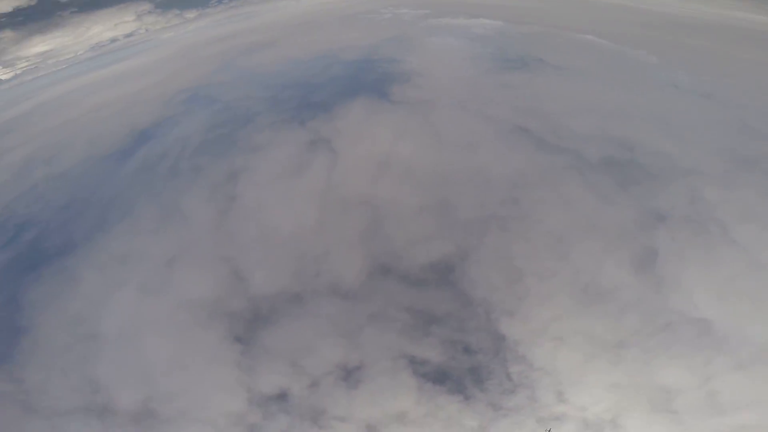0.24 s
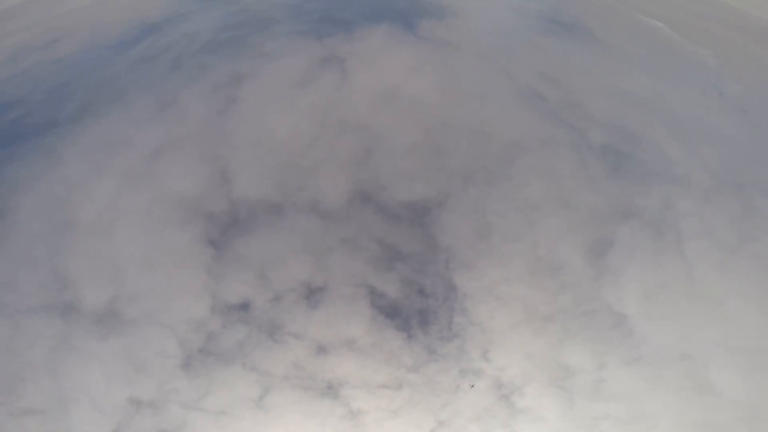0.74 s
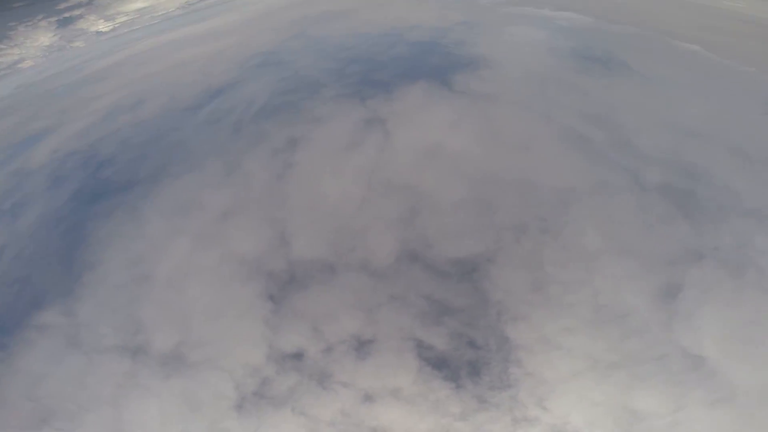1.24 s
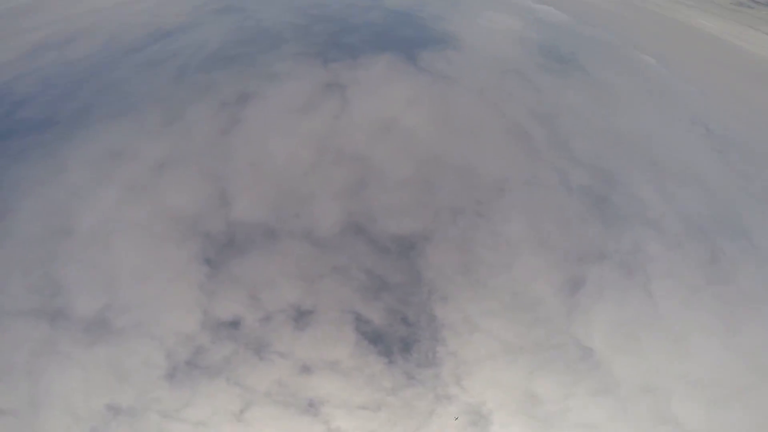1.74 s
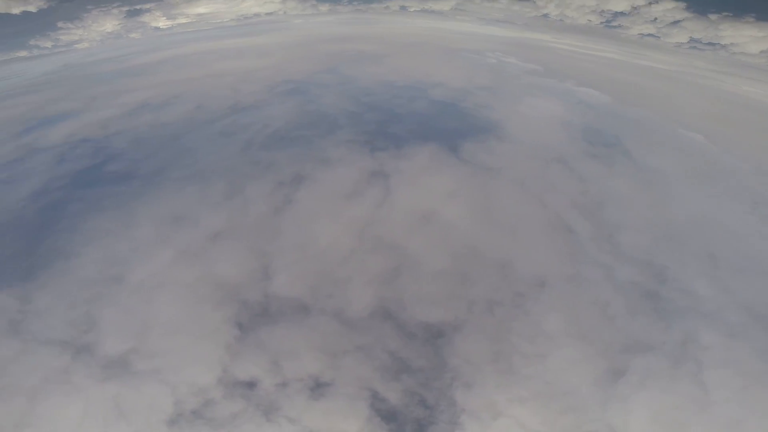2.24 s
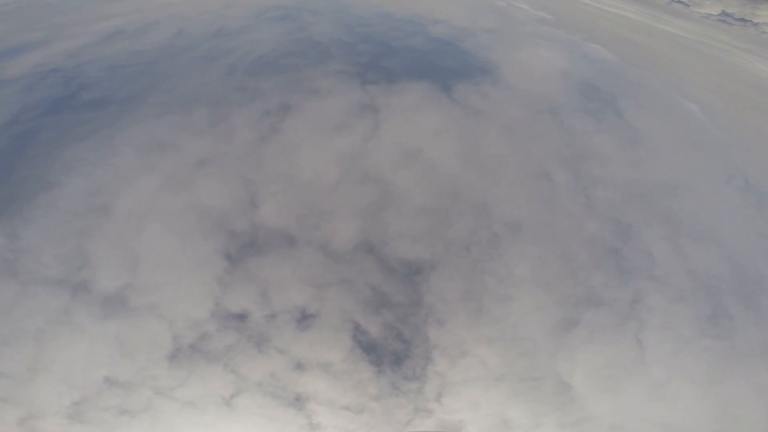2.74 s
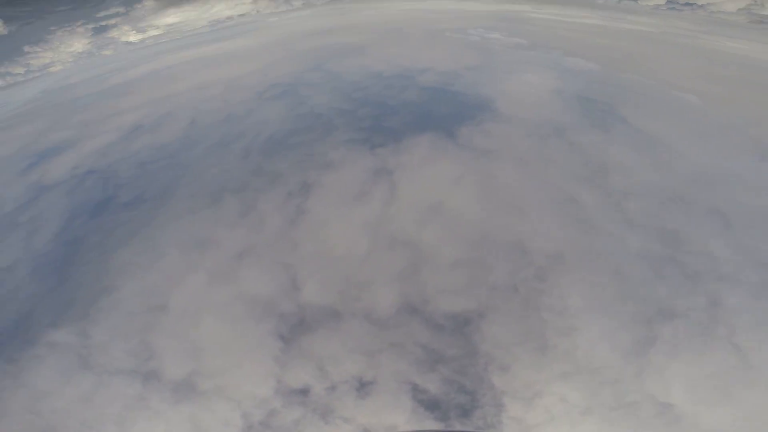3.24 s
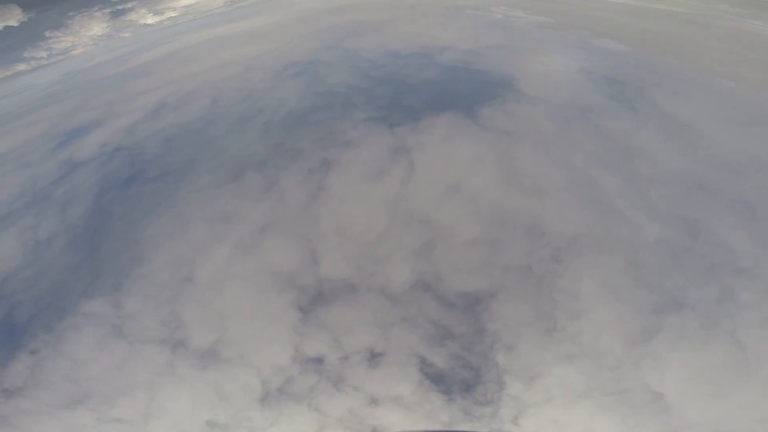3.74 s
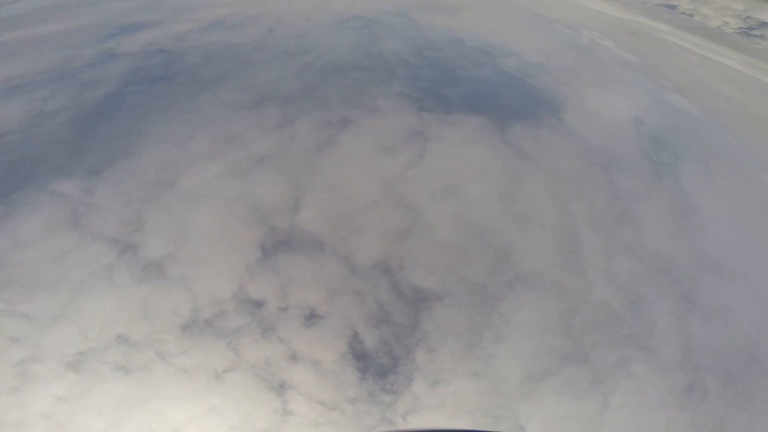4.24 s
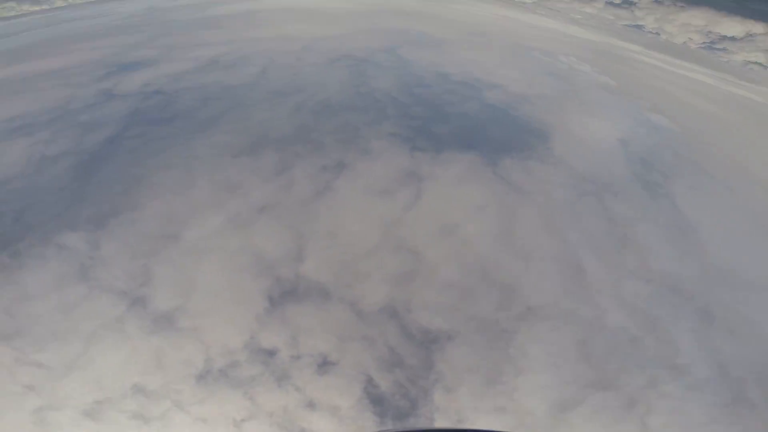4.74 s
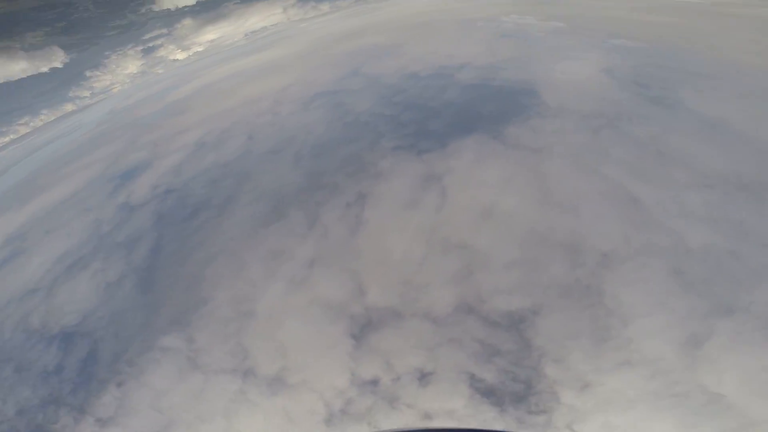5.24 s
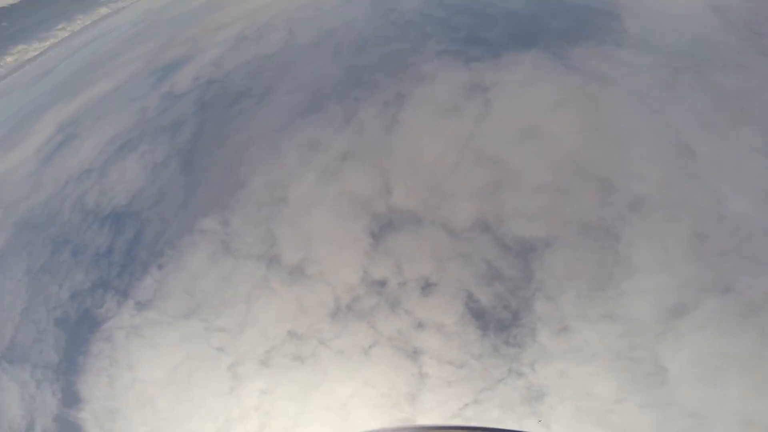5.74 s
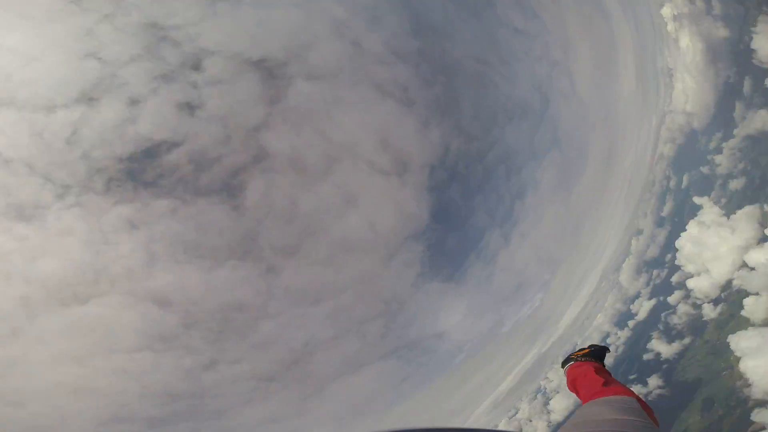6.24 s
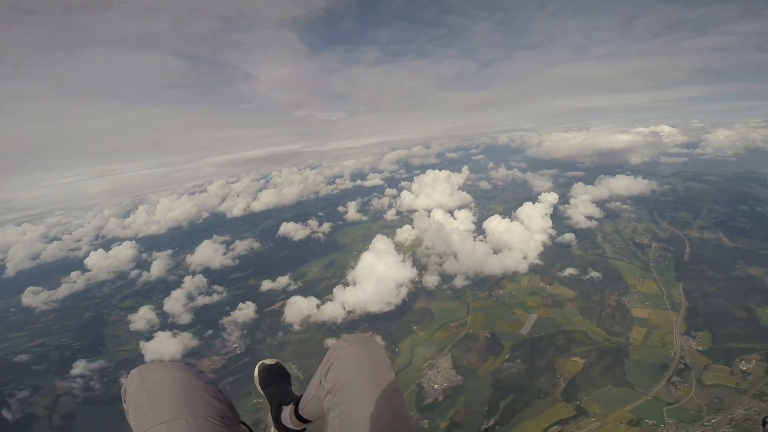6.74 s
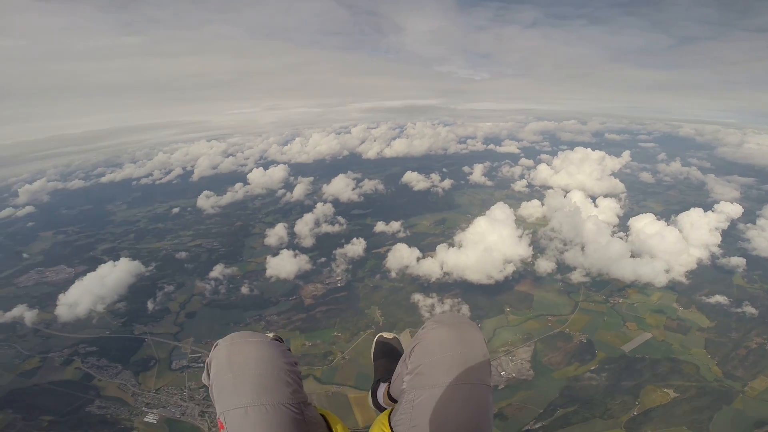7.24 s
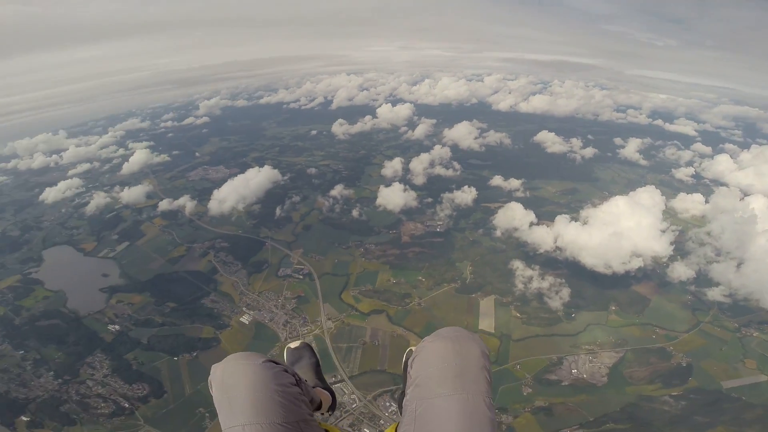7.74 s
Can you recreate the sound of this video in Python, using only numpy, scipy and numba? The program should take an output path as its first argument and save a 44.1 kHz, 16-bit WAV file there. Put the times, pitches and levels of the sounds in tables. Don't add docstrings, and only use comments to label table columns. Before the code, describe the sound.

Close, overloaded wind noise in free fall high among clouds. Air skims the camera housing with a rough hiss, a rumbling drone underneath and hollow noisy howls near the start, around one and a half seconds and just before six. Then the camera rolls upright into its own wake: the sound turns darker and broken, full of low thumps, gaps and bursting puffs.

```python
import sys
import numpy as np
from scipy import signal
from scipy.fft import rfft, irfft, next_fast_len
from scipy.io import wavfile
from scipy.ndimage import uniform_filter1d
from numba import njit

SR = 44100
rng = np.random.default_rng(int(sys.argv[2]) if len(sys.argv) > 2 else 0)


def convert_level_to_amplitude(level_db):
    exponent = np.asarray(level_db, float) / 20
    return 10 ** exponent


def waveform_to_disk(signal):
    frames = np.transpose(np.atleast_2d(signal))
    scaled = np.clip(frames, -1, 1) * 32767
    samples = np.round(scaled).astype(np.int16)
    wavfile.write(sys.argv[1], SR, samples)


N = 352359

# start_s, peak_db, treble_share_db
PUFFS = [(6.409, -2.5, -23), (6.4885, -1, -29), (6.5957, -14.5, -21), (6.6343, -9, -28), (6.665, -17, -21),
         (6.7776, -8, -28), (6.8321, -20, -29), (6.884, -13, -24), (6.964, -4, -24), (6.991, -13, -25),
         (7.0367, -11, -23), (7.0558, -9.5, -24), (7.121, -10, -30), (7.175, -7, -25), (7.2125, -5.5, -29),
         (7.285, -10, -25), (7.375, 1.5, -23.5), (7.4218, -7, -22), (7.5203, -9, -21), (7.553, 1, -24),
         (7.5716, -4, -27), (7.6995, -3, -24), (7.727, -6, -18.5), (7.771, -6, -24), (7.7978, -2, -24),
         (7.8174, 0.5, -24), (7.8436, -6, -26), (7.8658, -5, -23), (7.933, 0, -26), (7.9516, -2, -22)]
# start_s, peak_db, treble_share_db
SNAPS = [
    (1.0203, 4, -35),
    (1.816, -5.3, -30),
]
# start_s, depth_db, recovery_s
GAIN_DROPS = [
    (.686, -4, 0.22),
    (1.025, -9.5, 0.084),
    (1.826, -6.5, 0.11),
    (5.91, -4, 0.065),
    (4.6, -1.5, 0.042),
]
# pitch_hz, level_db (per Hz)
HISS_SPECTRUM = [(900, -16.5), (1200, -7), (1450, -4.5), (2000, -1.5), (2450, -2), (3100, -2.5), (3500, -6),
                 (6200, -11.5), (6600, -13.5), (7400, -18.5), (8900, -18.5), (11700, -24.5), (12400, -29),
                 (13900, -29.5), (15200, -37.5)]
# pitch_hz, level_db (per Hz)
RUSH_SPECTRUM = [(420, -11.5), (560, -8.5), (780, -1), (1000, -1.5), (1250, -2.5), (1500, -19)]
# pitch_hz, level_db (per Hz)
GROWL_SPECTRUM = [(120, -5), (150, -8.5), (220, -3), (330, -4.5), (460, -8), (560, -15)]
# pitch_hz, width_hz, lift_db
HOUSING_RINGS = [(1475, 210, 4.5), (2010, 200, 2.5), (2730, 190, 6), (4860, 420, 2), (5930, 380, 2.5),
                 (8150, 370, 1), (12060, 200, 3)]
# pitch_hz, width_hz, level_db
PUFF_RINGS = [(1600, 380, 0), (1900, 380, 0), (3000, 700, -7)]
# start_s (centre), length_s, pitch_hz, width_hz, lift_db
WHISTLES = [(0.592, .06, 8500, 1200, 4), (0.624, 0.036, 5000, 1200, 3), (1.3, .15, 2800, 250, 3.5),
            (1.62, .05, 2800, 400, 5), (2.8, .15, 7800, 900, 5), (3.55, .15, 10700, 900, 6.5),
            (3.6, .16, 5000, 500, 4), (4.35, .3, 2720, 120, 2), (4.45, .2, 8000, 900, 4.5),
            (5.65, .3, 2750, 120, 0), (5.73, .14, 5000, 1400, 5), (6.15, .12, 8650, 900, 5.5)]
# start_s (centre), low_hz, high_hz, level_db
SIDE_NOISE = [(.375, 6200, 8350, -36), (3.0, 8200, 9800, -40), (3.0, 12400, 15200, -48),
              (4.95, 4240, 7450, -29), (4.95, 12400, 13900, -53), (5.0, 4600, 5750, -32),
              (5.0, 10300, 11900, -44), (5.72, 8900, 10500, -38), (5.72, 13100, 14600, -52),
              (5.95, 4600, 5750, -35), (6.11, 4200, 5160, -28)]
# start_s, peak_db
KNOCKS = [
    (6.489, -0.5),
    (6.521, -6),
    (6.541, -5),
    (6.993, -8),
    (7.214, -1.5),
    (7.441, -9),
    (7.70, -4.5),
]
# start_s (centre), length_s, level_db
LULLS = [(7.024, 0.011, -8), (7.25, 0.016, -9), (7.277, .007, -5), (6.93, .012, -3), (7.135, .006, -3),
         (7.458, 0.02, -6.5), (7.691, 0.01, -11), (7.946, 0.0054, -8), (7.968, 0.0044, -5),
         (1.85, 0.018, -2), (1.045, .015, -1), (7.76, 0.0087, -9), (7.1, 0.023, -4), (7.715, .005, -6),
         (9, .005, -7), (6.53, .005, -4), (5, .006, -3), (6.655, .006, -4), (9.9, 0.0087, -5),
         (7.785, 0.0054, -13)]
# start_s (centre), length_s, level_db
SURGES = [(6.75, .03, 2.9), (6.985, 0.052, 5), (7.13, .008, 4), (7.293, .008, 5), (7.315, 0.032, 7),
          (7.405, 0.027, 5.5), (7.54, 0.034, 3), (7.64, 0.015, 1), (7.735, .012, 2), (7.87, 0.065, 2),
          (6.5, .02, 2)]
# start_s, flow_db, exposure_db, fineness_db (of the eddies)
FLOW = [(0, -21, 2, 3), (.4, -19.5, 0, 0.5), (1.2, -19, 0, 0.5), (1.55, -20.5, 0.5, 0),
        (1.98, -20.5, -0.5, 0.5), (2.25, -20.5, 1.5, 3), (2.7, -19.5, -0.5, 0), (3.1, -19.5, 0, 0),
        (3.55, -20.5, 1, 3), (4.5, -18.5, 0, -1.5), (5.0, -21, 1, 3), (5.4, -18.5, -1, 1),
        (6.33, -19.5, 1.5, -1), (6.37, -24.5, -3.5, 5), (6.515, -21.5, -6, -1), (6.535, -35.5, -5.5, 1),
        (7.2, -31, -5, -1), (7.99, -25, -3.5, -4)]
# start_s, cavity_drive_db (over the flow), cavity_hz
PORT_ANGLE = [(0, 2.5, 1420), (.55, 0.5, 1480), (.9, 2.5, 1540), (1.45, 0, 1480), (2.0, -1.5, 1590),
              (2.45, 1.5, 1430), (2.6, -.5, 1600), (3.25, -2.5, 1700), (3.6, -1, 1670), (4.3, -1.5, 1650),
              (4.9, -2, 1640), (5.3, -1, 1700), (5.6, -2.5, 1650), (6.3, -0.5, 1650), (6.5, 1.5, 1500),
              (6.6, 1.5, 1690), (7.99, 3, 1750)]
# start_s, shedding_db, churning_db
EDDIES = [(0, -25, 2.5), (.55, -21, 0.5), (.95, -19, 0.5), (1.1, -20, 4.5), (1.55, -23.5, -0.5),
          (2.1, -21.5, 0), (2.35, -25, -2.5), (2.5, -21.5, 1.5), (2.9, -19, 0), (3.6, -24.5, 1.5),
          (4.25, -19.5, 2.5), (4.6, -19.5, -1.5), (5.05, -31, -4.5), (5.4, -27, 3), (5.75, -21, -0.5),
          (6.4, -21, -0.5), (7.15, -17.5, -2), (7.99, -19.5, 6)]
# start_s (centre), length_s, shedding_db, churning_db
EDDY_BREAKS = [(0.057, 0.046, 3, 0.5), (0.21, .05, -8, 0.5), (0.71, 0.11, -4, -1), (0.935, 0.048, 4, 4),
               (2.47, .04, 3, -1), (4.38, 0.055, -5.5, 0), (4.66, .04, -5, 1), (5.3, .05, 4.5, 2),
               (5.55, .1, 0, -2), (5.5, 0.088, 1, 3.5), (6.34, .03, -7, -4), (6.44, 0.037, 4, 5),
               (6.62, 0.059, -1, -2), (6.505, .03, 3, 4), (5.08, .07, -0.5, -3), (2.58, .08, -0.5, 2),
               (3.7, .2, -0.5, 1), (7.5, 0.055, 1.5, -2), (7.32, .04, -2, 4), (7.88, 0.036, -6, 1)]
# start_s, length_s, lift_db, pitch_hz
HOWLS = [
    (.635, 0.119, 4.5, 1840),
    (0.969, .05, 6, 1780),
    (1.602, .224, 7, 1760),
    (5.798, 0.076, 3.5, 1820),
    (6.2, .06, 2, 2050),
    (6.26, .105, 3, 1780),
]
# start_s, length_s, flow_db, exposure_db
TURNS = [
    (.757, 0.219, -5.5, -4),
    (.79, 0.083, -1, -1.5),
    (.59, 0.063, 0, 1),
    (1.565, .04, 3.5, 0.5),
    (6.26, 0.072, -2, 3.5),
    (0.78, .055, -0.5, 2),
]

HOWL_DUCKS = dict(flow=0.33, fine=0.3, rush=1.14, growl=0.68, shedding=0.56, buffeting=1.2)
EDGE_S = 0.015
ROLL_S, ROLL_TAKES_S = 6.4, 0.12
THUMP_S, THUMP_LASTS_S, THUMP_DB = 6.475, .08, 9
SHED_HZ, WAKE_SHED_HZ = 97.1, 78.4
FLUTTER_DB, WAKE_FLUTTER_DB = 1, 4
BUFFET_DB, WAKE_BUFFET_DB, BUFFET_FOLLOWS_CHURN = -37.5, -21, .8
GROWL_DB, WAKE_GROWL_DB = -24, -24
RUSH_DB, WAKE_RUSH_DB, RUSH_FOLLOWS_FLOW, RUSH_FOLLOWS_CHURN = -26, -28, 0.54, 0.48
DULL_DB, DULL_PER_FINE = 2.5, .3
TEAR_DB, TEARS_PER_S, SHRED_DB, SHREDS_PER_S = 1, 37, 2, 75


def rms_one(x):
    return x / np.sqrt(np.mean(x ** 2) + 1e-20)


def in_time(rows):
    s, *columns = np.transpose(rows)
    return [np.interp(np.arange(N) / SR, s, column) for column in columns]


def held(start_s, length_s, edge_s):
    t = np.arange(N) / SR
    inside_s = np.minimum(t - start_s, start_s + length_s - t)
    return np.clip(inside_s / edge_s + .5, 0, 1)


def swing(rows, column):
    t = np.arange(0, N + 16, 16) / SR
    total_db = sum(row[column] * np.exp(-((t - row[0]) / row[1]) ** 2) for row in rows)
    return np.interp(np.arange(N) / SR, t, total_db)


def bumps(times_s, peak_db, rise_s):
    marks, t = np.zeros(N), np.arange(SR // 20) / SR
    marks[np.round(times_s * SR).astype(int)] = convert_level_to_amplitude(peak_db)
    shape = (t / rise_s * np.exp(1 - t / rise_s)) ** 2
    return signal.oaconvolve(marks, shape)[:N]


def drift(rate):
    r = np.exp(-16 * np.pi * rate / SR)
    noise = rng.standard_normal(N // 8 + 4002)
    slow = signal.lfilter([1], [1, -2 * r, r * r], noise)[4000:]
    slow -= uniform_filter1d(slow, size=SR // 40)
    return np.interp(np.arange(N) / 8, np.arange(len(slow)), rms_one(slow))


def band(x, low_hz, high_hz):
    edges_hz = [low_hz, min(high_hz, .45 * SR)]
    return signal.sosfilt(signal.butter(2, edges_hz, "band", fs=SR, output="sos"), x)


@njit
def sweep(x, hz, r, sr):
    y = np.zeros(len(x))
    for i in range(2, len(x)):
        push = (1 - r * r) / 2 * (x[i] - x[i - 2])
        y[i] = push + 2 * r * np.cos(2 * np.pi * hz[i] / sr) * y[i - 1] - r * r * y[i - 2]
    return y


def resonance(x, hz, width_hz):
    return sweep(x, hz * np.ones(N), np.exp(-np.pi * width_hz / SR), SR)


def coloured(x, hz_points, db_points):
    size = next_fast_len(N + 8192)
    hz = np.maximum(np.arange(size // 2 + 1) * SR / size, 1)
    gain = convert_level_to_amplitude(np.interp(np.log(hz), np.log(hz_points), db_points))
    wide = np.pad(x, (4096, size - N - 4096), "reflect")
    return irfft(rfft(wide) * gain, size)[4096:4096 + N]


def evened(x, over_s, share):
    power = uniform_filter1d(x ** 2, size=int(over_s * SR))
    return rms_one(x / (np.abs(power) + 1e-12) ** (share / 2))


def banded_noise(spectrum, gust_db, patchy_db, colour_db=lambda hz: 0):
    hz_points, db_points = np.transpose(spectrum)
    octaves = np.log2(hz_points[-1] / hz_points[0])
    edges = hz_points[0] * 2 ** np.arange(0, octaves + .4, 1 / 3)
    noise = [coloured(white, hz_points, db_points) for white in rng.standard_normal((2, N))]
    patch, out = drift(2.5), 0
    for k, (low, high) in enumerate(zip(edges, edges[1:])):
        patch = 0.48 * patch + 0.33 * drift(6.6)
        gain = convert_level_to_amplitude(colour_db(np.sqrt(low * high)) + gust_db + patchy_db * patch)
        out = out + gain * band(noise[k % 2], low, high)
    return out / np.std(noise)


def side_noise():
    t, noise, out = np.arange(N) / SR, rng.standard_normal(N), 0
    for s, low_hz, high_hz, db in SIDE_NOISE:
        moment = np.clip(2 - np.abs(t - s) / .009, 0, 1)
        edges_hz = [low_hz * .99, low_hz, high_hz, high_hz * 1.01]
        out = out + convert_level_to_amplitude(db) * moment * rms_one(coloured(noise, edges_hz, [-120, 0, 0, -120]))
    return out * [[1], [-1]]


def buffeting(level_db):
    lumps = band(rng.standard_normal(N), low_hz=27, high_hz=63.3)
    return convert_level_to_amplitude(level_db) * evened(lumps, over_s=.06, share=0.63)


def shedding(level_db, hz):
    noise = rng.standard_normal(N)
    drone = resonance(resonance(noise, hz, width_hz=23.0), hz, width_hz=119)
    return convert_level_to_amplitude(level_db) * evened(drone, over_s=0.043, share=0.38)


def housing_pressure(flow_db, lock_db, wake, gust_db):
    shed_db, churn_db = in_time(EDDIES)
    shed_db = shed_db + swing(EDDY_BREAKS, column=2)
    churn_db = churn_db + swing(EDDY_BREAKS, column=3)
    churn_db = churn_db + THUMP_DB * held(THUMP_S, THUMP_LASTS_S, edge_s=.03)

    shed_db = shed_db - HOWL_DUCKS["shedding"] * lock_db
    drone = shedding(shed_db, SHED_HZ + wake * (WAKE_SHED_HZ - SHED_HZ))

    buffet_db = BUFFET_DB + wake * (WAKE_BUFFET_DB - BUFFET_DB)
    buffet_db = buffet_db + (1 - wake) * BUFFET_FOLLOWS_CHURN * churn_db - HOWL_DUCKS["buffeting"] * lock_db

    growl_db = GROWL_DB + wake * (WAKE_GROWL_DB - GROWL_DB) + churn_db - HOWL_DUCKS["growl"] * lock_db
    growl = convert_level_to_amplitude(growl_db) * banded_noise(GROWL_SPECTRUM, 1.3 * gust_db, patchy_db=2.0)

    rush_db = RUSH_DB + wake * (WAKE_RUSH_DB - RUSH_DB) - HOWL_DUCKS["rush"] * lock_db
    rush_db = rush_db + RUSH_FOLLOWS_FLOW * (flow_db + 20) + RUSH_FOLLOWS_CHURN * churn_db
    rush = convert_level_to_amplitude(rush_db) * banded_noise(RUSH_SPECTRUM, 1.2 * gust_db, patchy_db=2.5)
    return drone + buffeting(buffet_db) + growl + rush


def knocks():
    s, peak_db = np.transpose(KNOCKS)
    return band(bumps(s, peak_db - 1.5, rise_s=0.00072), low_hz=109, high_hz=800)


def puffs():
    s, peak_db, treble_db = np.transpose(SNAPS + PUFFS)
    noise = rng.standard_normal(N)
    body = sum(convert_level_to_amplitude(db) * resonance(noise, hz, width) for hz, width, db in PUFF_RINGS)
    body = evened(body, over_s=0.0025, share=1.0)
    body = rms_one(band(body, low_hz=1000, high_hz=3800))
    top = coloured(noise, [2500, 3800, 6400, 7400, 11000, 15000], [-20, 7.5, -0.5, -11.5, -17, -38])
    low_puffs = body * bumps(s, peak_db - 9.5, rise_s=0.002)
    return low_puffs + rms_one(top) * bumps(s, peak_db + treble_db + 8, rise_s=0.0017)


def tearing(wake):
    shreds = drift(SHREDS_PER_S)
    shreds = shreds + 0.45 * np.minimum(shreds, 0)
    return wake * (TEAR_DB * drift(TEARS_PER_S) + SHRED_DB * shreds)


def howl(port_db, hiss_db, hz, gust_db):
    power = np.maximum(convert_level_to_amplitude(2 * port_db) - convert_level_to_amplitude(2 * (hiss_db - 2.5)), 1e-7)
    noise = rng.standard_normal(N)
    cavity = resonance(resonance(noise, hz * 0.9, width_hz=440), hz * 1.029, width_hz=390)
    return np.sqrt(power) * convert_level_to_amplitude(gust_db) * rms_one(cavity)


def hiss(level_db, presence_db, top_db, dull_db, gust_db):
    presence_db = presence_db - np.median(presence_db)
    top_db = top_db - np.median(top_db)

    def colour_db(hz):
        octave = np.log2(hz / 3300)
        presence = np.interp(octave, [0, .55, .95, 1.45], [0, 1, 1, 0])
        top = np.interp(octave, [.95, 1.45], [0, 1])
        return presence * presence_db + top * top_db - dull_db * max(octave - 1.55, 0)

    air = banded_noise(HISS_SPECTRUM, gust_db, patchy_db=1.22, colour_db=colour_db)
    lifts = sum((convert_level_to_amplitude(db) - 1) * resonance(air, hz, width) for hz, width, db in HOUSING_RINGS)
    t = np.arange(N) / SR
    for s, length, hz, width, db in WHISTLES:
        swell = np.exp(-((t - s) / length) ** 2)
        lifts = lifts + (convert_level_to_amplitude(db) - 1) * swell * resonance(air, hz, width)
    return convert_level_to_amplitude(level_db + 2.0) * (air + lifts)


def port_air(flow_db, exposure_db, fine_db, lock_db, gust_db):
    drive_db, cavity_hz = in_time(PORT_ANGLE)
    for s, length, _, hz in HOWLS:
        pull = held(s - .015, length + .03, edge_s=0.032)
        cavity_hz = cavity_hz + pull * (hz - cavity_hz)
    hiss_db = flow_db - HOWL_DUCKS["flow"] * lock_db
    top_db = exposure_db + fine_db - HOWL_DUCKS["fine"] * lock_db
    air = hiss(hiss_db, exposure_db, top_db, DULL_DB - DULL_PER_FINE * fine_db, gust_db)
    air = air + howl(flow_db + drive_db + lock_db, hiss_db, cavity_hz, gust_db)
    return air * convert_level_to_amplitude(swing(LULLS + SURGES, column=2))


def scene():
    flow_db, exposure_db, fine_db = in_time(FLOW)
    lock_db = sum(db * held(s, length, EDGE_S) for s, length, db, _ in HOWLS)
    turn_db = sum(db * held(s, length, EDGE_S) for s, length, db, _ in TURNS)
    exposure_db = exposure_db + sum(db * held(s, length, EDGE_S) for s, length, _, db in TURNS)
    wake = held(ROLL_S + ROLL_TAKES_S / 2, 10, ROLL_TAKES_S)
    flutter_db = FLUTTER_DB + wake * (WAKE_FLUTTER_DB - FLUTTER_DB)
    gust_db = flutter_db * (0.27 * drift(4.8) + .5 * drift(95) + 0.44 * drift(220))
    low = housing_pressure(flow_db + 0.39 * turn_db, lock_db, wake, gust_db)
    port_flow_db = flow_db + turn_db + tearing(wake)
    port = port_air(port_flow_db, exposure_db, fine_db, lock_db, gust_db)
    air = low + knocks() + puffs() + port
    return np.array([air, air])


def top_cut(x):
    return signal.sosfilt(signal.butter(12, 15280, fs=SR, output="sos"), x)


def record(dry):
    t = np.arange(N) / SR
    gain_db = 0
    for s, db, recovery_s in GAIN_DROPS:
        gain_db = gain_db + db * (t > s) * np.exp(-np.maximum(t - s, 0) / recovery_s)
    gain_db = uniform_filter1d(gain_db, size=SR // 300)
    mono = 2.5 * np.tanh(dry[0] * convert_level_to_amplitude(gain_db) / 2.5)
    mono = coloured(mono, [14, 24, 15290, 15370], [-30, 0, 0, -70])
    return top_cut(np.clip(mono, -1, 1) + side_noise())


dry = scene()
out = record(dry)
waveform_to_disk(out)
```